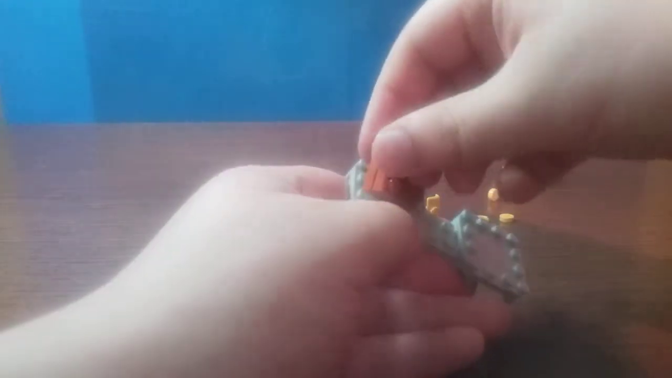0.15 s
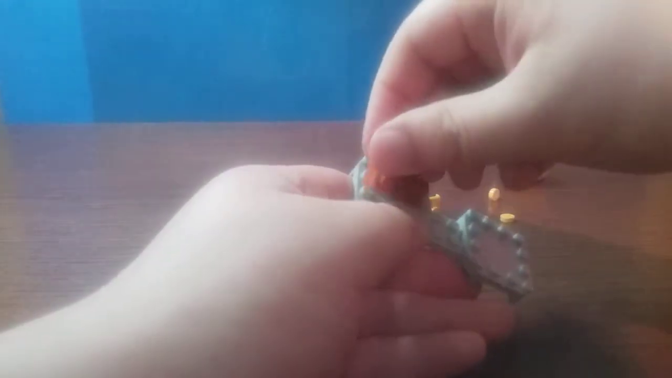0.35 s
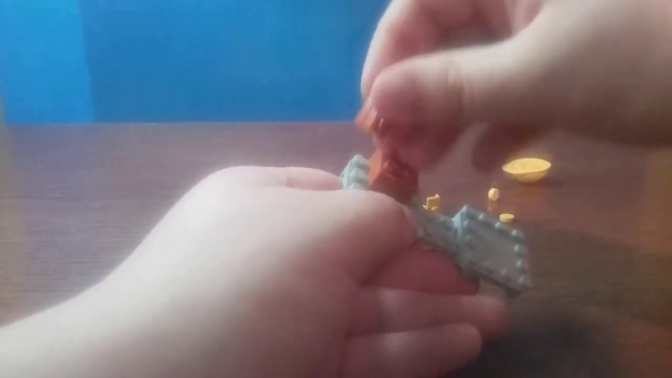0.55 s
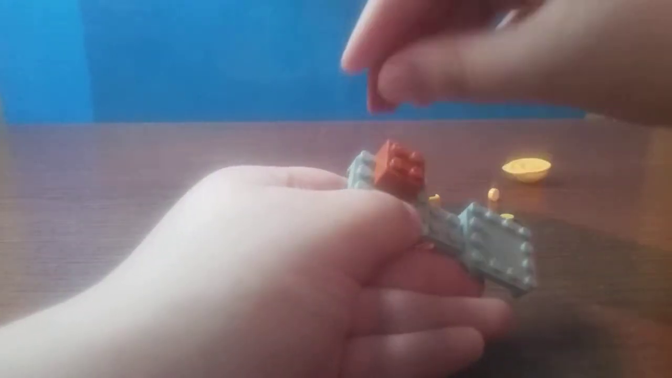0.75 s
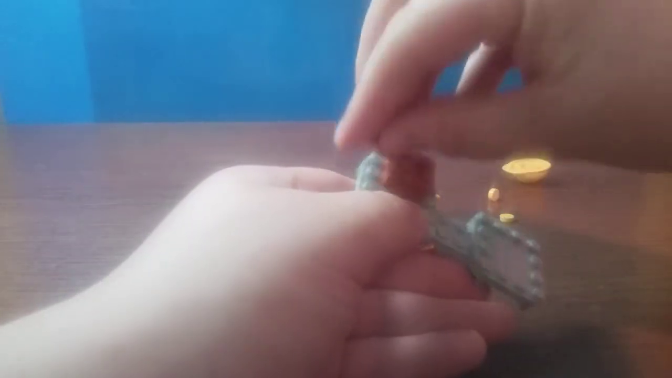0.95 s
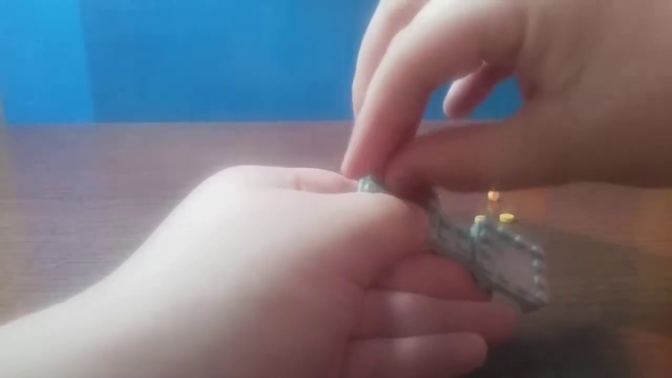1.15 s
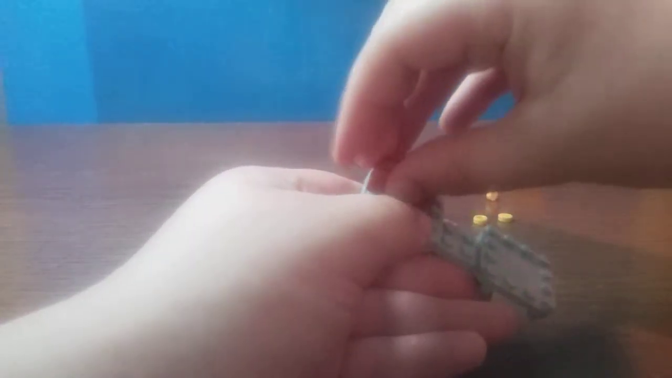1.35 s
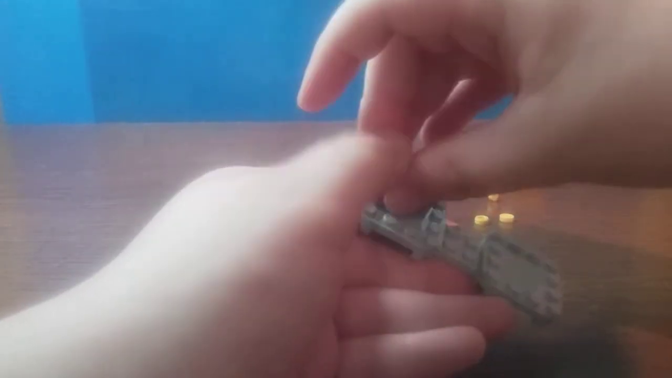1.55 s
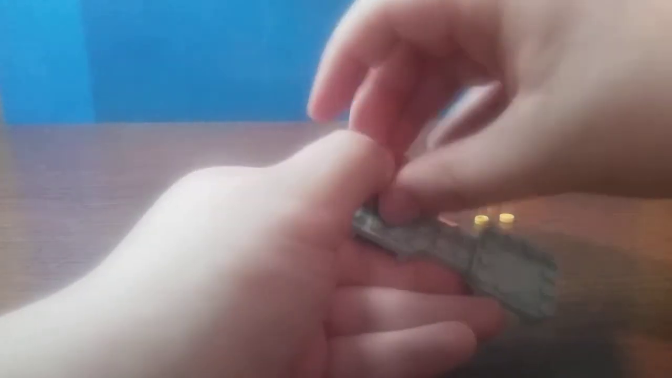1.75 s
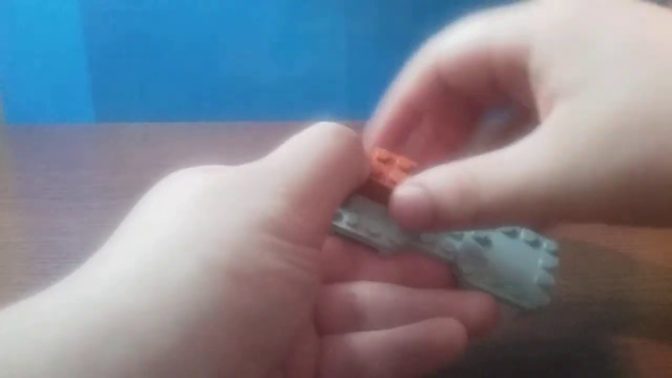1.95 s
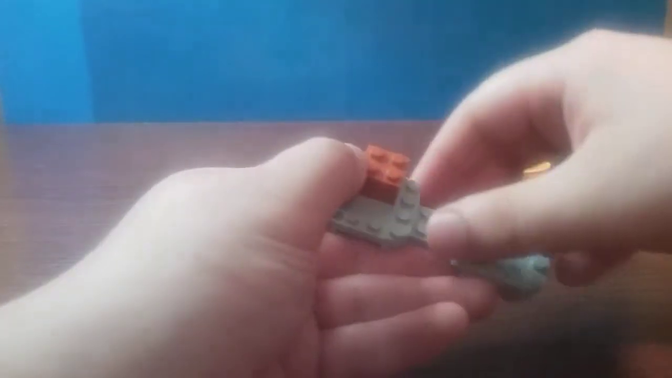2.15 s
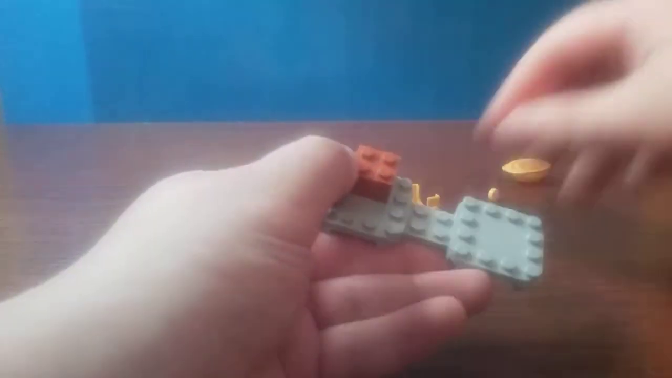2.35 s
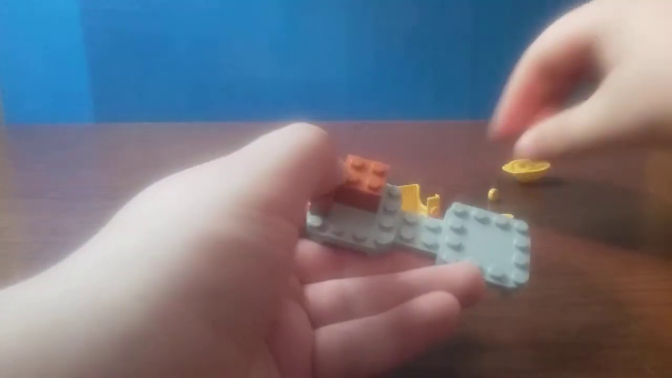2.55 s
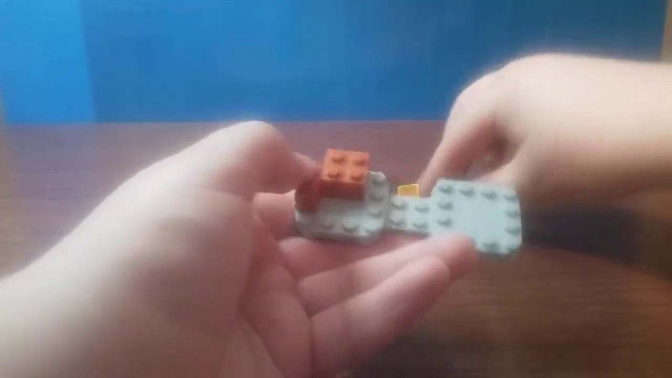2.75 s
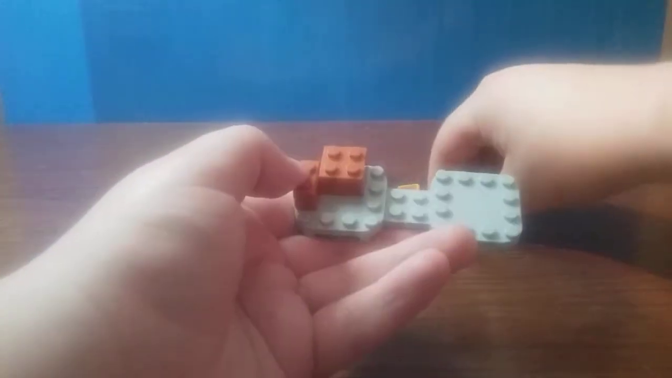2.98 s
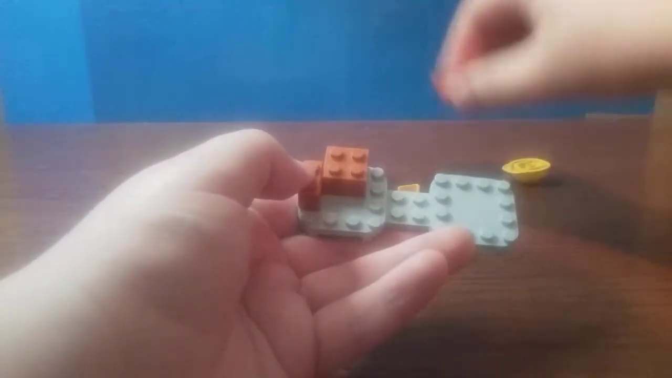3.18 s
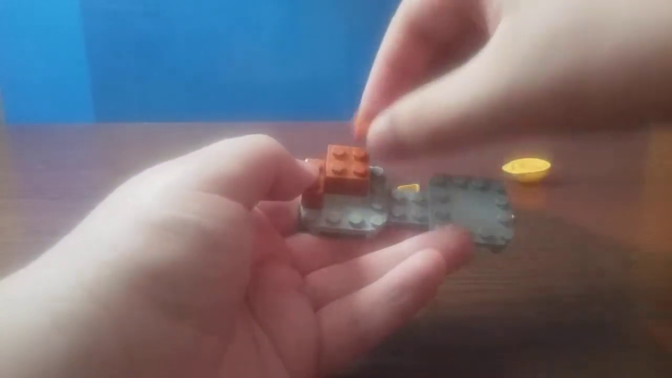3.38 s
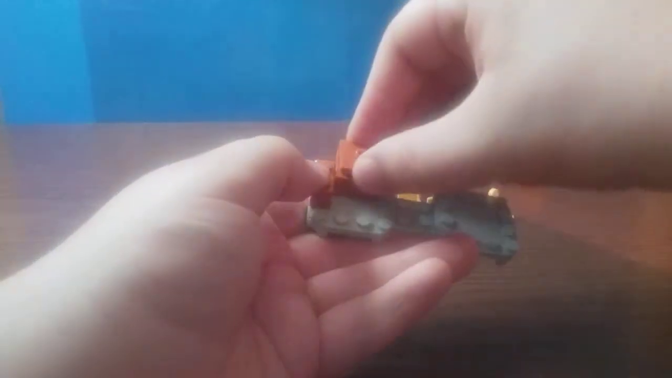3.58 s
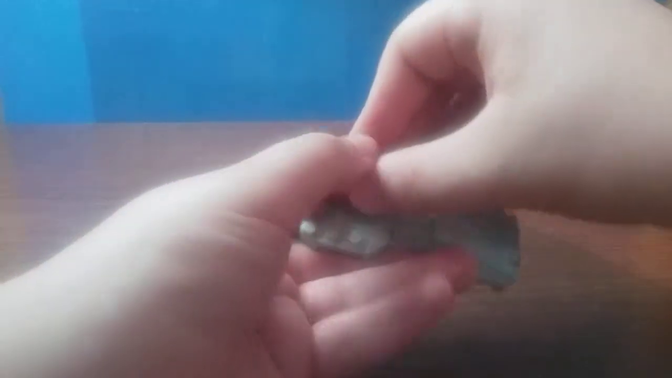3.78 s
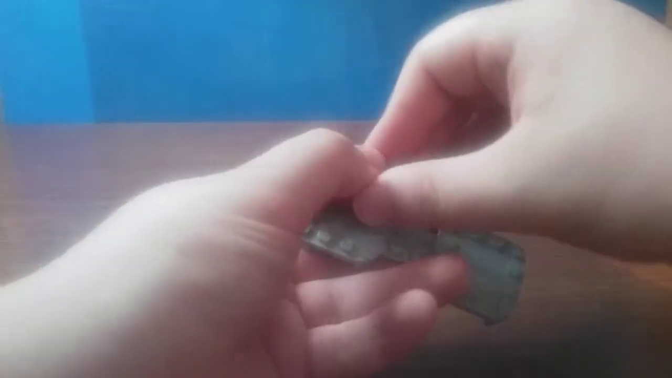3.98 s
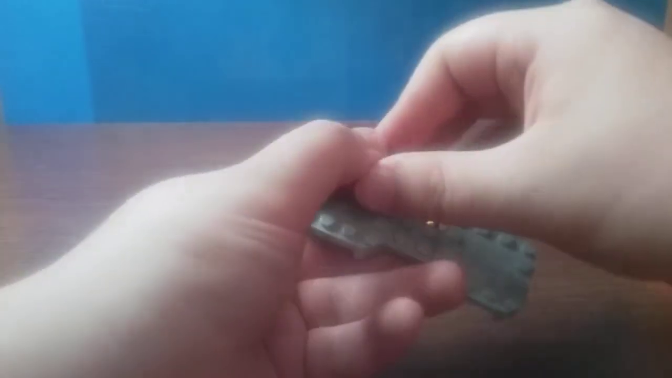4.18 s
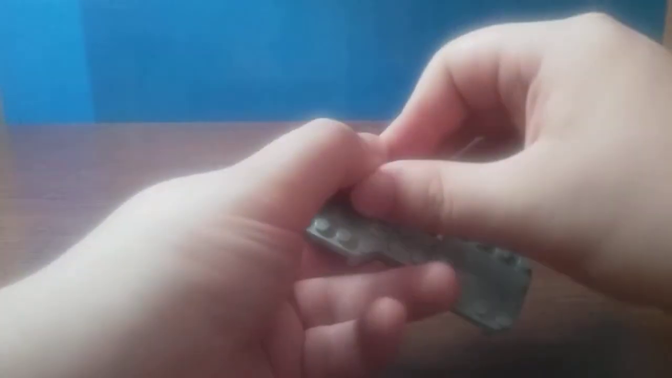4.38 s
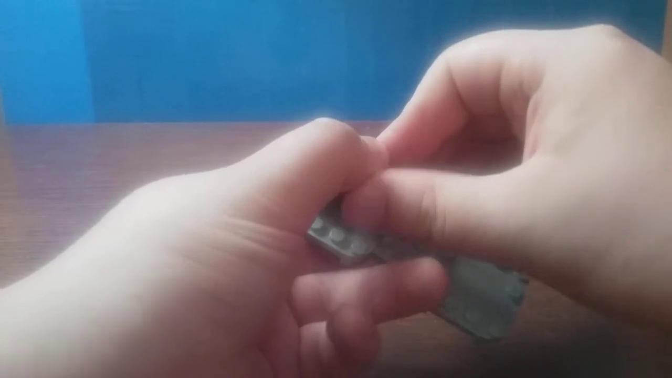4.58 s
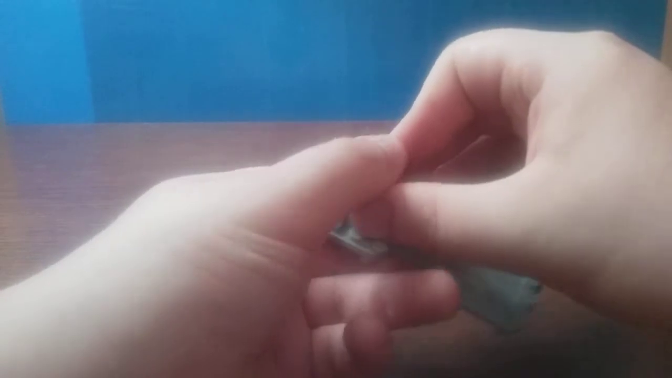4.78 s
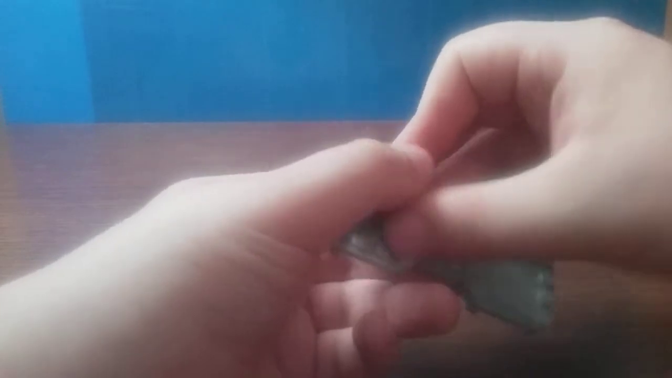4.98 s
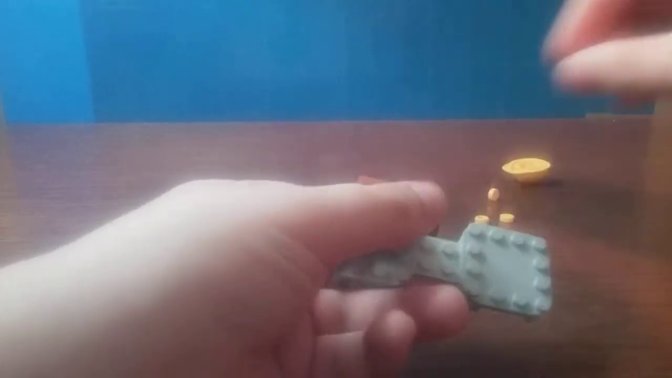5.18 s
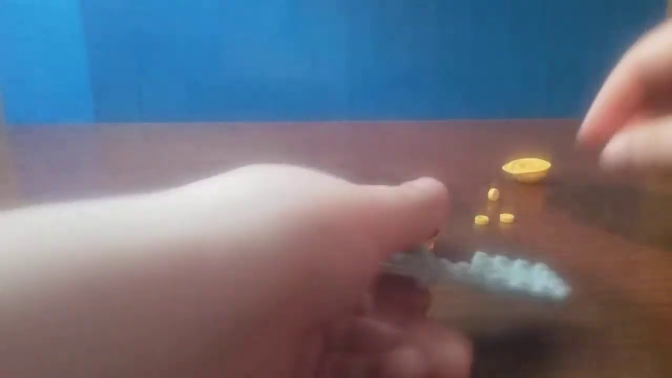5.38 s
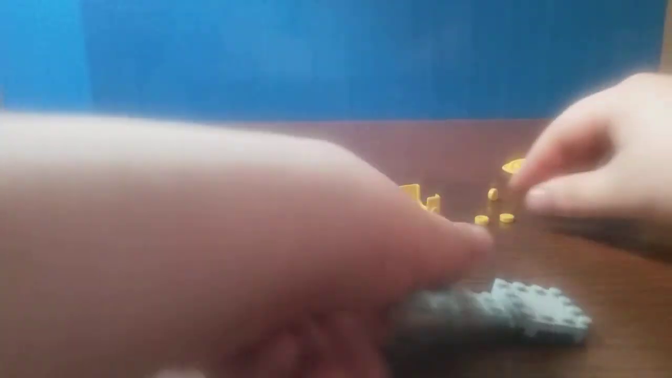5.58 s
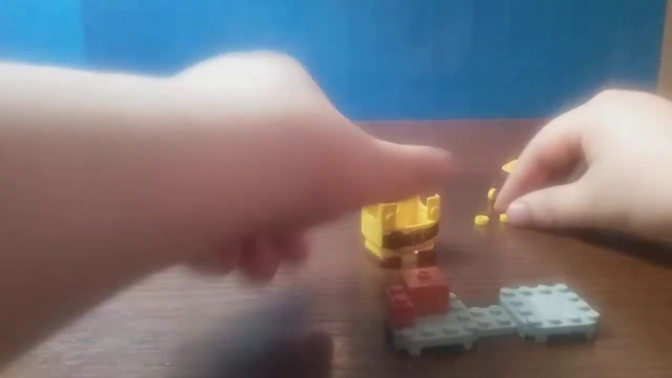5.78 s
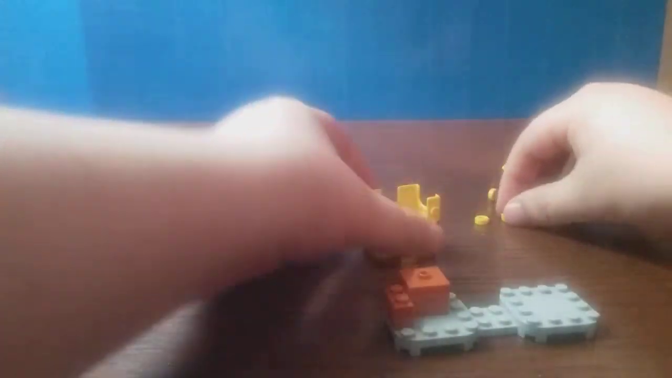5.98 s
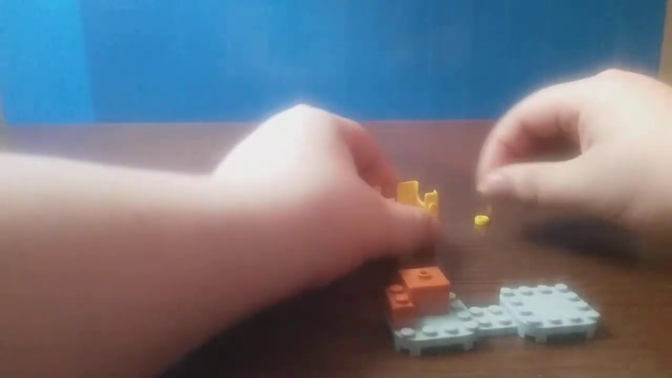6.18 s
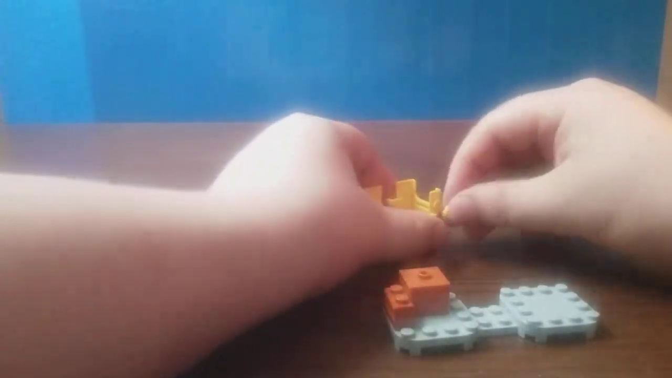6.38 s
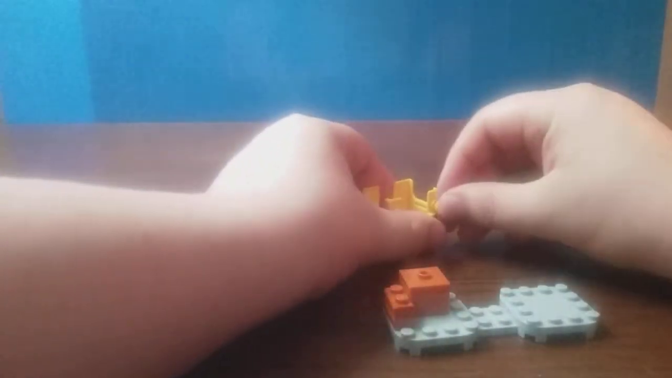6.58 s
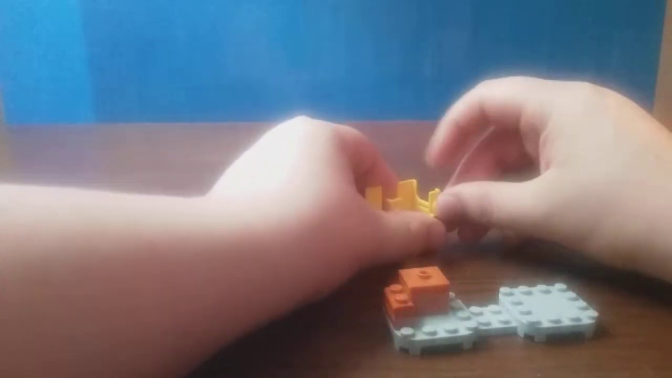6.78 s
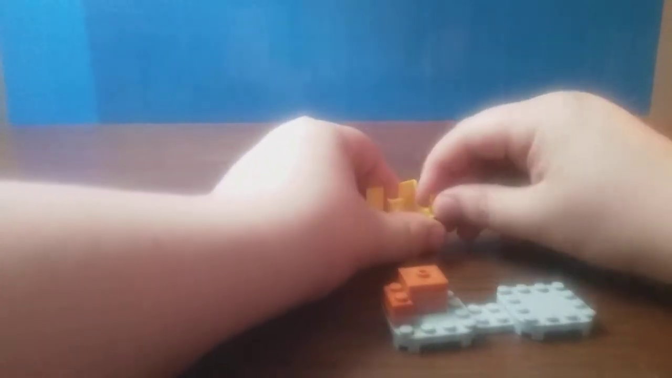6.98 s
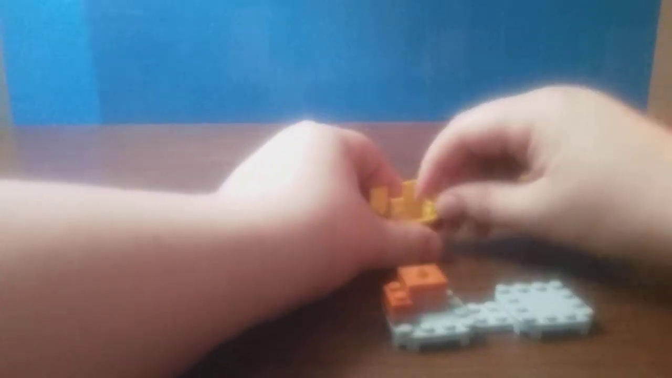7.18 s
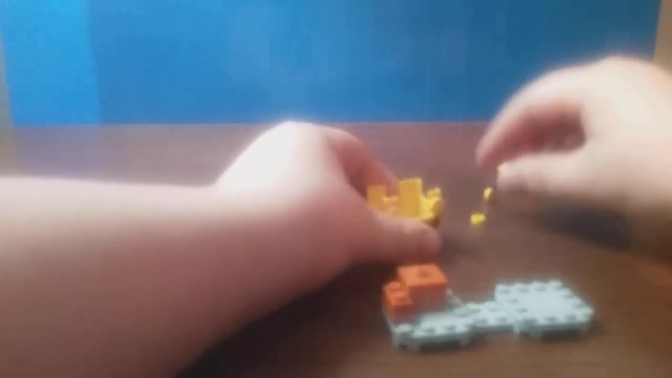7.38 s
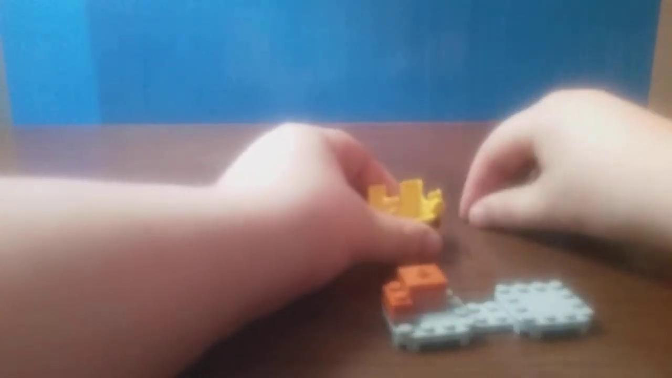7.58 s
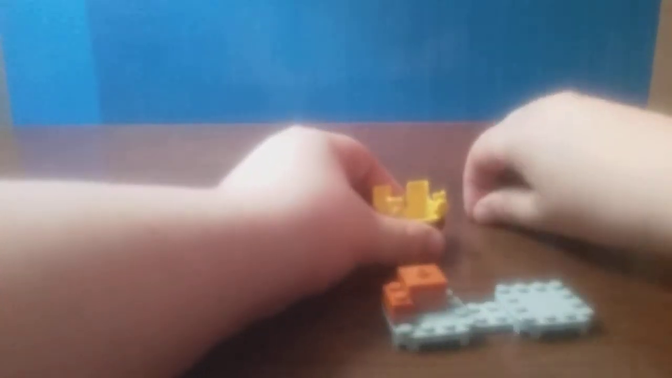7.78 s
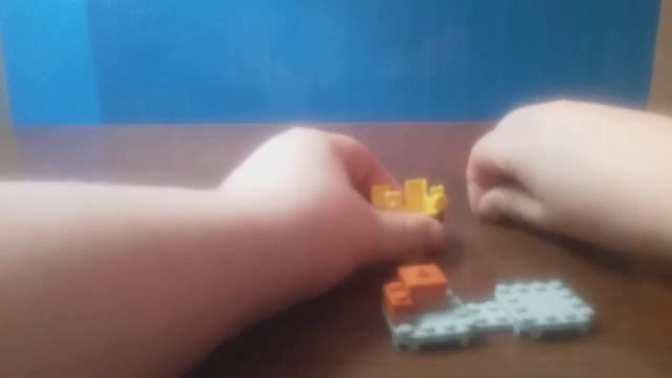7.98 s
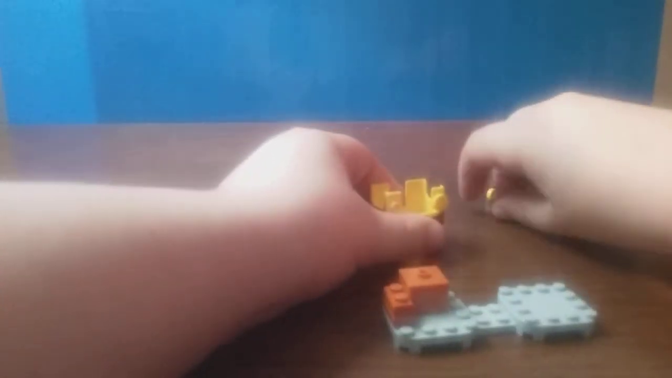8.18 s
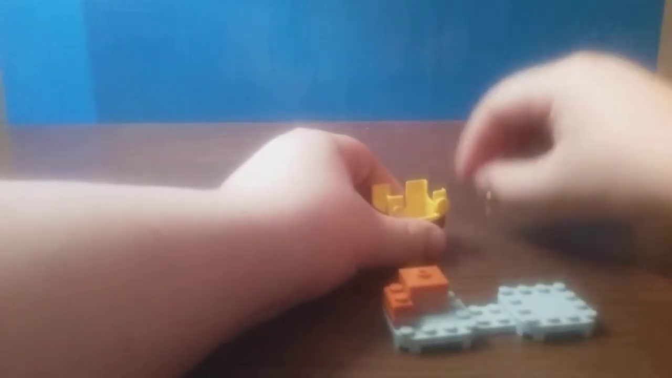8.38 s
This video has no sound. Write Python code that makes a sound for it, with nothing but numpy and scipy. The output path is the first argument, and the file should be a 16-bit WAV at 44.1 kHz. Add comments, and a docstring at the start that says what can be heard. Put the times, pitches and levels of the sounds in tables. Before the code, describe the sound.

Bright, hard plastic clicks come in small groups, some crisp and some barely audible, with low soft bumps through the table. Midway, a short scrape leads to two loud clacks and a quick bouncing clatter as a small brick model lands on wood. Lighter ticks, snaps and muffled wooden knocks finish it. Single-channel close pickup, short room echoes, quiet airy background.

```python
"""Small plastic bricks tick and snap as hands press them together above a wooden table, close to the microphone.
Each contact is one sharp push with a little chatter, ringing through the resonances of plastic and wood.
The half-built model is put down, topples and rattles to rest; wood knocks dully, pieces are nudged and slid.
Dull, low bumps come through the table as hands and arms lean on it.
A small room answers with short echoes, over soft hiss and a faint, slightly unsteady hum."""
import sys
import numpy as np
from scipy import signal
from scipy.fft import rfft, irfft
from scipy.io import wavfile
from scipy.ndimage import map_coordinates

SR = 44100
rng = np.random.default_rng(int(sys.argv[2]) if len(sys.argv) > 2 else 0)


def dump_mix(stems):
    """Bounce the given channels to the path in sys.argv[1] as a 16-bit WAV at rate SR."""
    frames = np.atleast_2d(stems).T  # one column per channel
    limited = np.clip(frames, -1, 1)  # hard clip at full scale
    pcm = np.round(limited * 32767).astype(np.int16)
    wavfile.write(sys.argv[1], SR, pcm)


N = 372202

# Room air, relative spectrum: freq_hz [Hz], level_db [dB]
AIR_SPECTRUM = [(15, -17.5), (40, -13.5), (58, 4), (78, -4), (95, -3.5), (160, -11.5), (320, -9.5),
                (600, -15), (1300, -18), (2600, -20.5), (4000, -24.5), (6500, -30), (11000, -32),
                (15500, -27.5)]
# Faint hum, rms level before its slow drift: pitch_hz [Hz], level_db [dB]
HUM_TONES = [(237, -78), (474, -87.5)]
# Decay of the small room: freq_hz [Hz], t60_s [s]
ROOM_DECAY = [(100, 0.82), (400, .42), (1500, 0.28), (5000, 0.23), (8000, 0.13), (14000, .28)]

# Brick against brick; parts are relative to the wall's ring, chatter to the push of the contact:
# start_s [s], level_db [dB], ring_hz [Hz], shell_hz [Hz], shell_db [dB], stud_db [dB], crack_db [dB], chatter_db [dB]
BRICK_CLICKS = [(0.3023, -31.5, 5330, 2840, -13, -24, -27, 3), (0.398, -39.5, 5500, 2900, -14, -24, -18, 9),
                (0.4095, -38.5, 5460, 2100, -15, -21, -19, 8),
                (0.5314, -41.5, 4450, 3650, -10, -20, -16, 9.5),
                (0.5928, -33, 4500, 3730, -21, -15, -14.5, 12),
                (0.6072, -38, 4360, 3880, -15, -24, -13, 11), (0.9707, -29, 4200, 3430, -2, -20, -21, 14),
                (1.0315, -24.5, 4300, 3700, -2, -24, -23.5, 7),
                (1.061, -13.5, 5140, 3400, -7.5, -35, -48, -3), (1.131, -27, 5230, 3140, -15, -21, -30, 1),
                (1.44, -10.5, 5250, 2900, -11, -12.5, -23, 23),
                (2.0186, -38.5, 6150, 3720, -4, -15, -20, -5),
                (2.1296, -28.5, 4700, 3320, -19, -9, -22, 14),
                (3.5178, -17, 5160, 2400, -8.5, -15, -16.5, 3), (3.5274, -29, 4900, 2660, -1, -23, -26, -6),
                (3.5562, -30.5, 5540, 3430, -7, -21, -18, -11.5),
                (3.6043, -34.5, 5870, 3780, 3.5, -16, -12, -3),
                (3.9539, -29.5, 5060, 3930, -21, -22, -26, 2),
                (4.2431, -17, 5030, 3780, -9, -0.5, -9.5, -4.5),
                (4.2739, -11, 4870, 3850, -7.5, -4, -15.5, -4),
                (6.6495, -23.5, 4810, 3560, -12, -15, -14.5, 7),
                (6.781, -29.5, 4910, 3610, 0, -16, -18, -2),
                (6.7981, -15, 4900, 3750, -8.5, -20, -12.5, 18),
                (6.8088, -22.5, 5060, 3730, -1, -22, -2.5, -3.5),
                (7.0747, -20, 5150, 3450, 4.5, -17, -4.5, -1), (7.241, -40.5, 5200, 3000, 0.5, -10, -1, 20),
                (7.281, -28, 5940, 1854, -14, -11.5, -19, 0), (7.9718, -29.5, 5700, 3805, -9, -6, -22, -1),
                (8.021, -42.5, 5260, 3650, -1, -18, -12, 2)]
# Bright crack of plastic, relative spectrum: freq_hz [Hz], level_db [dB]
CRACK_SPECTRUM = [(2000, -16.5), (5000, -5), (8300, -14.5), (9800, -3), (12000, -2.5), (14500, -1),
                  (16000, -1)]

# Pieces sliding under the fingers: start_s [s], length_s [s], plastic_db [dB], wood_db [dB]
SLIDE_STROKES = [(0.532, 0.14, -76, -87), (0.99, 0.052, -76, -86), (5.106, 0.069, -74.5, -89),
                 (5.218, 0.031, -75.5, -90), (5.33, 0.12, -66, -79.5), (5.438, 0.061, -62, -67),
                 (5.667, .035, -59, -54.5), (6.16, 0.053, -71, -67), (6.235, 0.065, -81, -74)]
# Plastic rubbing on skin, relative spectrum: freq_hz [Hz], level_db [dB]
RUB_SPECTRUM = [(500, -25), (2000, -27), (3500, -7), (5300, 1), (6500, -8), (8500, -29.5), (16000, -23)]
# Plastic scraping on wood, relative spectrum: freq_hz [Hz], level_db [dB]
SCRAPE_SPECTRUM = [(200, -19), (900, 5.5), (1700, 3.5), (3000, 7), (6000, -13), (12000, -44.5)]
# Dry fizz over the rub, relative spectrum: freq_hz [Hz], level_db [dB]
FIZZ_SPECTRUM = [(3000, -20), (6000, -0.5), (9000, -2.5), (14500, -0.5), (16000, -2)]

# Dull knocks of the table and the model, under fingers and landings: start_s [s], level_db [dB], brightness_hz [Hz]
DULL_KNOCKS = [(2.016, -32.5, 490), (2.131, -30, 940), (4.275, -30, 1500), (5.417, -29.5, 280),
               (5.517, -23.5, 443), (5.714, -15, 554), (6.019, -31, 248), (6.087, -30.5, 249),
               (7.074, -16, 760), (7.647, -20.5, 806), (7.743, -23, 683), (7.802, -31, 494),
               (8.088, -30.5, 597), (8.159, -30.5, 397)]
# Wood when knocked, relative spectrum: freq_hz [Hz], level_db [dB]
WOOD_SPECTRUM = [(40, -23), (80, -7.5), (140, 6), (240, -3.5), (370, -2.5), (460, -4.5), (550, -2.5),
                 (690, -18), (900, -3), (1400, -4), (2500, -13), (5500, -10.5), (9000, -35)]

# Hands and arms leaning on the table, before scatter: start_s [s], length_s [s], peak_db [dB], pitch_hz [Hz]
TABLE_PUSHES = [(3.423, 0.056, -41.5, 92), (3.59, 0.074, -40, 102), (3.801, 0.047, -47.5, 112),
                (6.558, .06, -37, 98), (6.689, .115, -40.5, 95.4), (6.749, 0.019, -32.5, 130),
                (6.891, 0.044, -32, 105), (8.305, 0.022, -44.5, 80), (8.400, .022, -49, 120)]
# The whole table rocking on its legs: freq_hz [Hz], width_hz [Hz], level_db [dB]
TABLE_SWAY_MODES = [(72, 21, 0.5)]

# The base plate touching down on one edge: start_s [s], level_db [dB], ring_hz [Hz], edge_db [dB]
PLATE_CONTACTS = [(5.5148, 4.5, 5396, -29), (5.517, -1, 5176, -27.5)]
# The whole model toppling and bouncing: start_s [s], level_db [dB], ring_hz [Hz], edge_db [dB]
MODEL_BOUNCES = [(5.7136, 6.5, 5105, -14), (5.717, 5.5, 4500, -19), (5.7265, -5.5, 4570, -22.5),
                 (5.7702, 2.5, 5350, -25), (5.806, -12, 5460, -16), (5.8096, -0.5, 5240, -26.5),
                 (5.8322, -7.5, 4780, -23.5), (5.843, -10.5, 4440, -32), (5.851, -12.5, 5170, -22.5)]
# Resonances of the base plate: freq_hz [Hz], width_hz [Hz], level_db [dB]
PLATE_MODES = [(1400, 120, -6.5), (1910, 400, -14), (2679, 160, -2.5), (3210, 170, 0.5),
               (4350, 192.7, -14.5), (4560, 160, -12.5), (5124, 76, 7.5), (5680, 190, 0), (6100, 120, -8),
               (6905, 189, -17)]
# Resonances of the half-built model: freq_hz [Hz], width_hz [Hz], level_db [dB]
MODEL_MODES = [(1380, 87, -9.5), (1688, 130, -9.5), (2026, 130, -8), (2350, 140, -13.5), (3170, 190, -2.5),
               (3775, 110, 2), (3965, 100, -5.5), (4208, 90, -3.5), (4600, 110, -3.5), (4780, 95, 1),
               (5035, 110, 0.5), (5180, 100, 0.5), (5500, 160, 4.5), (5800, 140, -4.5), (6300, 160, -13)]
# Resonances of the table top: freq_hz [Hz], width_hz [Hz], level_db [dB]
BOARD_MODES = [(288.5, 70, -3), (399, 39, -5.5), (554, 15, -2), (865, 70, 2), (1016, 65, 0.5),
               (1420, 120, 0.5)]
# Lowest resonance of the table: freq_hz [Hz], width_hz [Hz], level_db [dB]
THUMP_MODES = [(145, 40, -1)]

# Tiny pieces nudged on the table: start_s [s], level_db [dB], low_hz [Hz], high_hz [Hz], wood_db [dB]
PIECE_NUDGES = [(6.161, -37.5, 1003, 5140, 3.5), (6.222, -30.5, 1676, 3550, -6.5),
                (6.305, -40, 1734, 3600, -6), (7.509, -33.5, 2600, 5000, 4.5), (7.574, -41, 2870, 5300, 3)]
# Wood under a tiny piece, relative spectrum: freq_hz [Hz], level_db [dB]
TINY_SPECTRUM = [(200, -3), (500, 6.5), (1000, 4), (1700, 3), (3400, -6.5), (4300, -8), (5300, -8),
                 (7000, -33), (14000, -40)]

AIR_DB = -70  # rms
KNOCK_IN_HAND_DB, KNOCK_ON_TABLE_DB = -27.5, -12.5  # the palm damps the low knock, the table carries it
# fingers feeling for the studs: (from s, to s), then one tick with the columns of BRICK_CLICKS after start_s
FUMBLING_S, FAINT_TICK = (2, 5.0), (-50, 5100, 2600, -1, -13, -5.5, 10)
FAINT_SCATTER_DB, FAINT_SCATTER_HZ = 4, 400
SLIDE_SWELL, SLIDE_RELEASE_S = 0.6, 0.015  # share of a stroke spent building up; its stop
FIZZ_DB = -16.5  # beside the rub of the plastic
JOLT_SCATTER_S, JOLT_SCATTER_DB, JOLT_SCATTER_HZ = 0.00293, 0.5, 12  # unevenness of the jolts in a push
STUD_OVER_EDGE_DB = -2  # a sharp edge wakes the studs along with the crack
NUDGE_HIGH_DB = -6  # the high ring beside the low one
TOP_HZ = 15950  # band limit of the recorder
T = np.arange(8192) / SR  # the life of one contact (s)
HZ = np.fft.rfftfreq(len(T), 1 / SR)


def amp(db):
    """Decibels to gain."""
    return 10 ** (np.asarray(db) / 20)


def unit(x):
    """Scaled to rms 1."""
    return x / np.sqrt(np.mean(x ** 2) + 1e-20)


def along(points, hz):
    """(Hz, value) points read on a log frequency axis."""
    point_hz, value = np.transpose(points)
    return np.interp(np.log(hz + 1), np.log(point_hz + 1), value)


def wobble(rate):
    """A smooth random curve, rate knots a second."""
    knots = rng.standard_normal(int(N * rate / SR) + 4)
    return map_coordinates(knots, [np.arange(N) * rate / SR])


def noise(spectrum):
    """Coloured noise of rms 1."""
    gain = amp(along(spectrum, np.fft.rfftfreq(N, 1 / SR)))
    return unit(irfft(rfft(rng.standard_normal(N)) * gain, N))


def causal(gain):
    """The minimum-phase response with this gain: it starts at once and dies soonest."""
    cepstrum = irfft(np.log(np.maximum(gain, 1e-6)))
    # fold the backward half of the cepstrum onto the forward half
    cepstrum[1:len(T) // 2] *= 2
    cepstrum[len(T) // 2 + 1:] = 0
    return np.exp(rfft(cepstrum))


def resonances(modes):
    """Response of a body with (Hz, width Hz, dB) resonances, summed in power."""
    power = 0
    for centre, width, db in modes:
        mode = amp(db) * HZ * width / (centre * centre - HZ ** 2 + 1j * HZ * width)
        power = power + np.abs(mode) ** 2
    return causal(np.sqrt(power))


def radiation():
    """Small parts radiate little bass, and the plastic damps the high treble."""
    bass_loss = 1 + (1200 / (HZ + 1)) ** 4
    treble_loss = 1 + (HZ / 7500) ** 16
    return causal(1 / np.sqrt(bass_loss * treble_loss))


def ring(hz, width_hz):
    """One steep-sided resonance of a plastic wall: a mode of this width applied twice, then radiated."""
    return resonances([(hz, width_hz, 0)]) ** 2 * radiation()


def contact(chatter_db, t60, repeat_db=-60):
    """The faces graze and meet in one sharp push, then chatter and settle; a weaker copy of the push, at
    repeat_db, follows about 3 ms later."""
    chatter = rng.standard_normal(len(T)) * amp(-60 * T / t60) * (1 - np.exp(-T / 0.0017))
    force = amp(chatter_db) * chatter / np.linalg.norm(chatter)
    force[round(0.0008 * SR)] += 1
    force[round(rng.uniform(0.0026, 0.0034) * SR)] += amp(repeat_db)
    return force


def struck(force, response):
    """A force passed through a response, with energy 1."""
    x = irfft(rfft(force) * response)
    return x / (np.linalg.norm(x) + 1e-12)


def in_room(x, wet_db):
    """A short sound with its early wall echoes and its own diffuse tail, dying at a rate set by frequency."""
    hz, t, grains = signal.stft(rng.standard_normal(SR // 2), SR, nperseg=256)
    decay = amp(-60 * t / along(ROOM_DECAY, hz)[:, None])
    tail = signal.istft(grains * decay, SR, nperseg=256)[1]
    age = np.arange(len(tail)) / SR
    tail *= (1 - np.exp(-age / 0.0072)) * (1 + 1.8 * np.exp(-age / 0.014))  # gradual onset, stronger early part
    tail *= amp(wet_db) / np.linalg.norm(tail)
    tail[0] += 1  # the direct sound
    return signal.fftconvolve(x, tail)


def add(track, s, x):
    """Mix x into the track at time s."""
    start = max(round(s * SR), 0)
    track[start:start + len(x)] += x[:N - start]


def room_tone():
    """Soft hiss and rumble as shaped noise, with hum tones that drift slightly in pitch and level."""
    turns = np.cumsum(1 + 0.004 * wobble(7.9)) / SR
    hum = sum(amp(db) * np.sqrt(2) * np.sin(2 * np.pi * hz * turns) for hz, db in HUM_TONES)
    return amp(AIR_DB) * noise(AIR_SPECTRUM) + hum * amp(2.1 * wobble(1.7))


def bricks():
    """Studs tick and snap into place: the wall that is hit rings over the hollow shell, a stud and a bright crack."""
    track = np.zeros(N)
    stud = ring(7520, width_hz=2100)
    crack = causal(amp(along(CRACK_SPECTRUM, HZ)))
    knock = resonances([(1050, 690, 0)])
    ticks = BRICK_CLICKS + faint_ticks(count=4)
    for s, db, ring_hz, shell_hz, shell_db, stud_db, crack_db, chatter_db in ticks:
        shell = resonances([(shell_hz, 1100, 0), (0.74 * shell_hz, 600, -7)]) * radiation()
        force = contact(chatter_db, t60=0.016, repeat_db=-7.5)
        in_hand = s < PLATE_CONTACTS[0][0]
        knock_db = KNOCK_IN_HAND_DB if in_hand else KNOCK_ON_TABLE_DB
        click = struck(force, ring(ring_hz, width_hz=1600))
        click += amp(shell_db) * struck(contact(chatter_db=20, t60=0.027), shell)
        click += amp(stud_db) * struck(force, stud)
        click += amp(crack_db) * struck(force, crack)
        click += amp(knock_db) * struck(force, knock)
        add(track, s, in_room(amp(db) * click, wet_db=-8))
    return track


def faint_ticks(count):
    """Rows of barely heard ticks at chance moments, scattered in level and ring pitch."""
    db, ring_hz, *colour = FAINT_TICK
    times = rng.uniform(*FUMBLING_S, count)
    scatter = rng.standard_normal((count, 2))
    rows = []
    for s, (louder, higher) in zip(times, scatter):
        rows.append((s, db + FAINT_SCATTER_DB * louder, ring_hz + FAINT_SCATTER_HZ * higher, *colour))
    return rows


def slides():
    """Grainy friction of plastic on skin and on wood, with a dry fizz on top; each stroke swells, holds and stops."""
    track, now = np.zeros(N), np.arange(N) / SR
    colours = (RUB_SPECTRUM, SCRAPE_SPECTRUM, FIZZ_SPECTRUM)
    rub, scrape, fizz = (unit(noise(colour) * amp(3 * wobble(220))) for colour in colours)
    plastic = rub + amp(FIZZ_DB) * fizz
    for s, length, plastic_db, wood_db in SLIDE_STROKES:
        corners_s = [0, SLIDE_SWELL * length, length, length + SLIDE_RELEASE_S]
        pressure = np.interp(now - s, corners_s, [0, 1, 1, 0])
        track += pressure * (amp(plastic_db) * plastic + amp(wood_db) * scrape)
    return track


def dull_knocks():
    """Dull knocks on wood: each is a chattering push whose treble falls away above its own brightness limit."""
    track = np.zeros(N)
    for s, db, bright_hz in DULL_KNOCKS:
        treble_loss = np.sqrt(1 + (HZ / bright_hz) ** 5)
        wood = causal(amp(along(WOOD_SPECTRUM, HZ)) / treble_loss)
        knock = struck(contact(chatter_db=10, t60=0.063), wood)
        add(track, s, in_room(amp(db) * knock, wet_db=-9))
    return track


def bumps(count):
    """A soft push comes in count uneven jolts; each sets the table swaying for a few low cycles."""
    track = np.zeros(N)
    # only a low band gets through: steep loss below 48 Hz, gentler above 290 Hz
    mount = causal(1 / np.sqrt((1 + (48 / (HZ + 1)) ** 12) * (1 + (HZ / 290) ** 6)))
    jolt_scatter = [JOLT_SCATTER_S, JOLT_SCATTER_DB, JOLT_SCATTER_HZ]
    for start, length, db, hz in TABLE_PUSHES:
        for s in np.linspace(start, start + length, count):
            late, louder, higher = rng.standard_normal(3) * jolt_scatter
            force = contact(chatter_db=-1, t60=0.12)
            table = resonances([(hz + higher, 55, 0)] + TABLE_SWAY_MODES)
            sway = struck(force, table * mount)
            add(track, min(s + late, N / SR), amp(db + louder) * sway / np.abs(sway).max())
    return track


def landing(contacts, modes, ring_db, knock_db, thump_db, chatter_db, chatter_t60, wet_db):
    """Each corner that meets the table rings the bricks' modes, its own wall, the studs and the table top."""
    track = np.zeros(N)
    shell = resonances(modes) * radiation()
    crack = causal(amp(along(CRACK_SPECTRUM, HZ)))
    stud = resonances([(8110, 800, 0)]) ** 2
    board, thump = resonances(BOARD_MODES), resonances(THUMP_MODES)
    for s, db, ring_hz, edge_db in contacts:
        force = contact(chatter_db + 2.5, chatter_t60, repeat_db=-2)
        clack = struck(contact(chatter_db, chatter_t60, repeat_db=-9.5), shell)
        clack += amp(ring_db) * struck(force, ring(ring_hz, width_hz=1100))
        edge = struck(force, crack) + amp(STUD_OVER_EDGE_DB) * struck(force, stud)
        clack += amp(edge_db) * edge
        clack += amp(knock_db) * struck(force, board)
        clack += amp(thump_db) * struck(force, thump)
        add(track, s, in_room(amp(db) * clack, wet_db))
    return track


def nudges():
    """A tiny piece tips against the wood with a short hollow tick of two tones."""
    track = np.zeros(N)
    wood = causal(amp(along(TINY_SPECTRUM, HZ)))
    for s, db, low_hz, high_hz, wood_db in PIECE_NUDGES:
        force = contact(chatter_db=10, t60=0.038)
        tick = struck(force, resonances([(low_hz, 450, 0)]) ** 2)
        tick += amp(NUDGE_HIGH_DB) * struck(force, ring(high_hz, width_hz=680))
        tick += amp(wood_db) * struck(force, wood)
        add(track, s, in_room(amp(db) * tick, wet_db=-7.5))
    return track


def scene():
    """Everything on and around the table, in one channel."""
    set_down = landing(PLATE_CONTACTS, PLATE_MODES, ring_db=-5, knock_db=-24, thump_db=-29,
                       chatter_db=1, chatter_t60=0.025, wet_db=-7)
    topple = landing(MODEL_BOUNCES, MODEL_MODES, ring_db=1, knock_db=-12.5, thump_db=-24,
                     chatter_db=6.5, chatter_t60=0.032, wet_db=-7)
    small_contacts = bricks() + slides() + dull_knocks() + bumps(count=3) + nudges()
    return (room_tone() + small_contacts + set_down + topple)[None]


def record(dry):
    """The recorder keeps nothing above its band limit."""
    in_band = np.fft.rfftfreq(N, 1 / SR) < TOP_HZ
    return irfft(rfft(dry) * in_band, N)


dry = scene()
out = record(dry)
dump_mix(out)
```